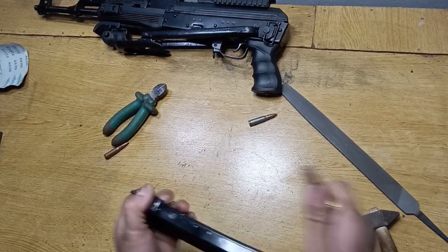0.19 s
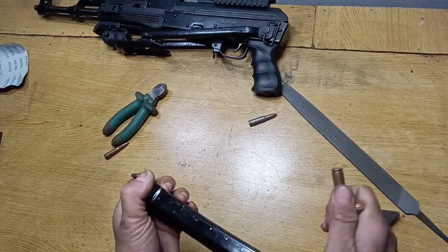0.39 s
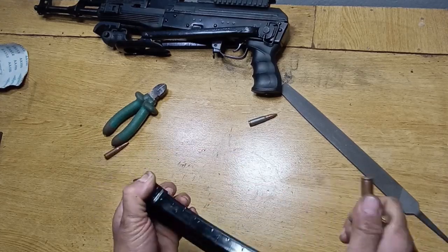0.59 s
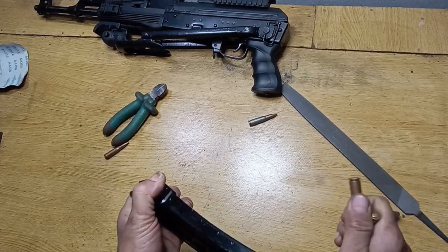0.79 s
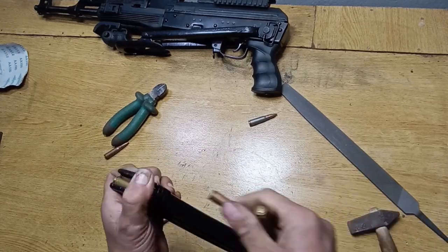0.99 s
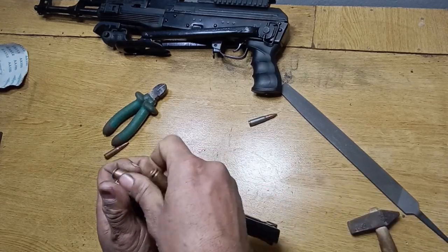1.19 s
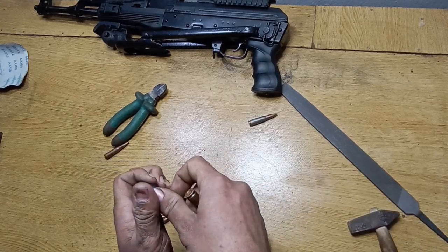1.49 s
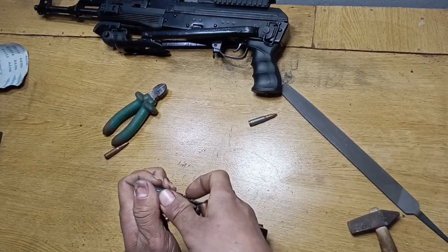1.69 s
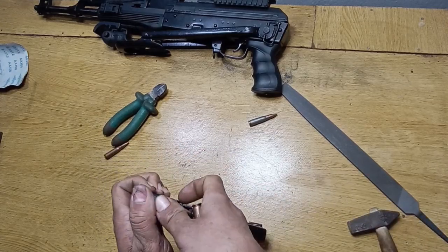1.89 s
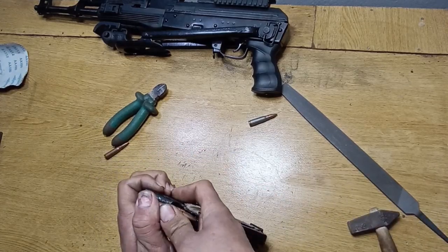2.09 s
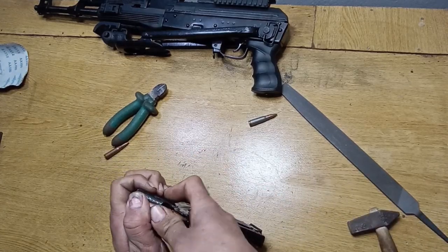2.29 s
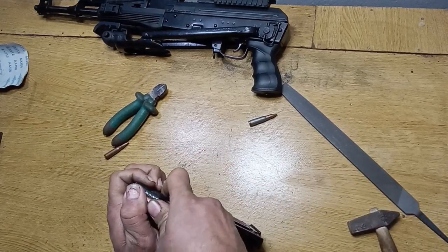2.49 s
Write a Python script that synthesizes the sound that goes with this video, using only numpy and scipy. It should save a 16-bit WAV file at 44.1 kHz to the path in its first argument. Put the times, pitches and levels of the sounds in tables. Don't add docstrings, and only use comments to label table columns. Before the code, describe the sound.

Metal cartridges knock and rattle on a thin steel magazine: a faint bump at the start, bright clacks at 0.25, 0.4 and 0.58 seconds, a softer, roomier one at 0.77. Faint rubbing near 1.0, a sharp tick at 1.25, a wooden bump, scuff and light clack around 1.5. From 2.0 to 2.5, small ticks, low bench thuds and a sliding scrape, then a faint last knock at 2.58. Close, dry small room.

```python
import sys
import numpy as np
from scipy import signal
from scipy.fft import rfft, irfft
from scipy.io import wavfile
from scipy.ndimage import uniform_filter1d, map_coordinates

SR = 44100
rng = np.random.default_rng(int(sys.argv[2]) if len(sys.argv) > 2 else 0)


def gain_from_db(level_db):
    decades = np.asarray(level_db, float) / 20
    return 10 ** decades


def generate_wav(signal):
    frames = np.transpose(np.atleast_2d(signal))
    scaled = np.clip(frames, -1, 1) * 32767
    pcm = np.round(scaled).astype(np.int16)
    wavfile.write(sys.argv[1], SR, pcm)


N = 114660


def at_hz(points, hz):
    points = np.array(points)
    return np.interp(np.log(hz), np.log(points[:, 0]), points[:, 1])


def rms_one(x):
    return x / np.sqrt(np.mean(x ** 2) + 1e-20)


def energy_one(h):
    return h / np.sqrt(np.sum(h ** 2))


def convolve(x, h):
    return signal.fftconvolve(x, h)[:N]


def filtered(x, order, hz, kind):
    return signal.sosfilt(signal.butter(order, hz, kind, fs=SR, output="sos"), x)


def colour(spectrum, rings=()):
    hz = np.arange(4097) * SR / 8192 + 1
    db = at_hz(spectrum, hz)
    for ring_hz, width_hz, boost_db in rings:
        db = db + boost_db / (1 + (2 * (hz - ring_hz) / width_hz) ** 2)
    ceps = irfft(db * np.log(10) / 20)
    ceps[1:4096] *= 2
    ceps[4097:] = 0
    return energy_one(irfft(np.exp(rfft(ceps)))[:4096])


def ring(x, hz, t60):
    r, w = gain_from_db(-60 / (t60 * SR)), 2 * np.pi * hz / SR
    return signal.lfilter([0, np.sin(w)], [1, -2 * r * np.cos(w), r * r], x + 1e-18)


def grains(per_s, spread_db):
    size = gain_from_db(spread_db * np.minimum(rng.exponential(1, N), 4)) * rng.choice([-1, 1], N)
    return rms_one(size * (rng.random(N) < per_s / SR))


# blow_s, peak_db, rattle_lead_in_s, room_db
KNOCK_EVENTS = [
    (0.003, -33, 0.0076, -14),
    (0.247, -20, 0.014, -7.5),
    (0.415, -18, 0.011, -5.5),
    (0.583, -13, 0.0095, -9.5),
    (0.763, -25.5, 0.0061, 0),
    (1.539, -29.5, 0.011, -13),
    (2.579, -33, 0.0047, -9),
]
# pitch_hz, level_db (per Hz)
KNOCK_SPECTRUM = [(50, -41), (140, -10), (660, -22), (900, -9), (4800, -2.5), (7500, -22.5), (10500, -39),
                  (15000, -19.5)]
# pitch_hz, width_hz, boost_db
SHELL_RINGS = [(946, 190, 8.5), (1370, 450, 5), (2424, 590, 8), (3100, 620, 4.5), (4320, 350, 5),
               (5434, 600, 4.5)]


def knocks():
    after_s, after_loss_db = 0.0096, 11.5
    lead_db = 16.5
    scrape_s, scrape_db = 0.02, 22
    t = np.arange(N) / SR
    rattle = grains(13000, 1.2)
    out = np.zeros(N)
    for blow_s, peak_db, lead_s, room_db in KNOCK_EVENTS:
        start_s = blow_s - lead_s
        times_s = [start_s - scrape_s, start_s - 0.001, start_s, blow_s, blow_s + after_s]
        levels_db = [-lead_db - 2 * scrape_db, -lead_db - scrape_db, -lead_db, 0, -after_loss_db]
        shape_db = np.interp(t, times_s, levels_db, -200, -200)
        blow = (np.arange(N) == int(blow_s * SR)) * 1.0
        gripped = [(hz * rng.uniform(0.99, 1.04), width_hz, boost_db + rng.normal(0, 2.5))
                   for hz, width_hz, boost_db in SHELL_RINGS]
        direct = gain_from_db(peak_db - 2 + shape_db) * rattle
        echo = gain_from_db(peak_db + room_db + 27.5) * room(blow)
        out += convolve(direct + echo, colour(KNOCK_SPECTRUM, gripped))
    return out


# start_s, peak_db, pitch_hz
CLACK_EVENTS = [(0.03, -38.5, 1230), (0.113, -51, 1900), (.2385, -22, 1052), (.2410, -19, 2830),
                (.2440, -15, 2240), (.2448, -19.5, 1110), (.2458, -17, 3240), (.2515, -21.5, 4650),
                (.2550, -23, 3560), (.4088, -18, 2090), (.4110, -21.5, 1310), (.4120, -17, 3100),
                (.4128, -12.5, 2330), (.4132, -8.5, 4480), (.4225, -25, 4750), (.4228, -27.5, 2300),
                (.5762, -19, 2600), (.5785, -15.5, 4860), (.5795, -16.5, 3000), (.5797, -28.5, 1180),
                (.5815, -10.5, 4820), (.5822, -19.5, 2520), (.5850, -18, 2780), (.5920, -17, 2300),
                (.5970, -14.5, 4800), (0.7629, -20, 2770), (0.767, -22.5, 4400), (0.771, -15.5, 4470),
                (0.7789, -22, 2400), (0.781, -21.5, 4430), (.797, -19, 4300), (0.816, -23, 3100),
                (.766, -27, 960), (.786, -29, 932), (.802, -37, 966), (1.5355, -22, 3500),
                (1.5375, -16.5, 4810), (1.5395, -25, 2890), (2.5755, -27.5, 2150), (2.5765, -32.5, 2800),
                (2.5760, -33.5, 4500)]


def clacks():
    ring_cycles, edge_cycles = 21, 4
    span = 1500
    t = np.arange(span) / SR
    out = np.zeros(N + span)
    for start_s, peak_db, hz in CLACK_EVENTS:
        shape = gain_from_db(-60 * t * hz / ring_cycles) - gain_from_db(-60 * t * hz / edge_cycles)
        i = int(start_s * SR)
        out[i:i + span] += gain_from_db(peak_db) * shape / shape.max() * np.sin(2 * np.pi * hz * t)
    return out[:N]


# start_s, peak_db, pitch_hz, room_db
TICK_EVENTS = [(0.0305, -32, 3580, -45), (0.1111, -44.5, 3840, -20), (0.1522, -49, 1506, -34),
               (1.0234, -35.5, 2630, -16.5), (1.2496, -12, 5680, -27), (1.3185, -47.5, 2210, -14),
               (1.353, -49.5, 1900, -19), (1.996, -57.5, 3000, -20), (2.011, -54, 1330, -6),
               (2.0115, -57, 3900, -10), (2.138, -51, 2540, -5), (2.171, -52.5, 1460, -10),
               (2.204, -50.5, 5660, -19), (1.727, -51.5, 2760, -16), (1.899, -48.5, 2280, -9),
               (1.9465, -48, 2295, -19), (2.0688, -49, 5000, -11), (2.1058, -38, 3810, -11.5),
               (2.1236, -41, 2210, -20.5), (2.1855, -45.5, 2240, -14), (2.2032, -52, 1660, -19.5),
               (2.537, -47, 2160, -11)]
# pitch_hz, level_db (per Hz)
TICK_SPECTRUM = [(500, -37), (900, -15), (2540, -14), (5400, 9), (7500, -17.5), (10000, -36.5),
                 (14000, -10)]


def ticks():
    spread_s, body_cycles, ring_cycles, ring_db = 0.0054, 10, 15, -5
    crack_per_db, crack_per_octave_db = 2.5, 2.5
    lowest_hz, span = 1060, 2000
    out = np.zeros((2, N + 4000))
    crack = colour(TICK_SPECTRUM)[:400]
    for (start_s, peak_db, hz, room_db), draw in zip(TICK_EVENTS, rng.random((len(TICK_EVENTS), 16))):
        late = draw[:8] ** 2 * (np.arange(8) > 0)
        size = gain_from_db(-12 * late - 6.1 * (late > 0)) * np.sign(draw[8:] - 0.5)
        touch = np.zeros(span)
        np.add.at(touch, (late * spread_s * SR).astype(int), size)
        body_t60 = body_cycles / hz
        body = ring(ring(touch, hz, body_t60), hz * 1.4, body_t60) * hz / 4000
        narrow = gain_from_db(ring_db) * ring(body, hz, ring_cycles / hz) * hz / 9000
        crack_db = crack_per_db * (peak_db + 26) + crack_per_octave_db * np.log2(hz / 4000)
        sound = gain_from_db(crack_db) * np.convolve(touch, crack)[:span] + body + narrow
        sound = filtered(sound, 4, min(lowest_hz, hz / 2), "high")
        i = int(start_s * SR)
        out[:, i:i + span] += gain_from_db(peak_db) * sound / np.max(np.abs(sound)) * [[1], [gain_from_db(room_db + 19)]]
    return out[:, :N]


def rub(strokes, spectrum, rings, per_s=1600, spread_db=0, glide=0):
    glide_period_s, glide_mid_s = 0.66, 2.36
    t = np.arange(N) / SR
    shape = 0
    for start_s, length_s, level_db, attack_s, sag_db in strokes:
        fall_s = 0.0053 + 0.063 * length_s
        rise = np.clip((t - start_s) / attack_s, 0, 1)
        fall = np.clip((start_s + length_s - t) / fall_s, 0, 1)
        shape = shape + gain_from_db(level_db - sag_db * (t - start_s) / length_s) * rise * fall
    if not glide:
        return convolve(shape * grains(per_s, spread_db), colour(spectrum, rings))
    read = np.cumsum(1 + glide * np.sin(2 * np.pi * (t - glide_mid_s) / glide_period_s))
    texture = convolve(grains(per_s, spread_db), colour(spectrum, rings))
    return shape * map_coordinates(texture, [read], mode="wrap")


# start_s, length_s, level_db (rms), attack_s, sag_db
SLIDE_STROKES = [
    (2.229, 0.28, -42.5, 0.036, 22),
]
# pitch_hz, level_db (per Hz)
SLIDE_SPECTRUM = [(500, -10.5), (1200, -24.5), (1550, -3.5), (2750, -3.5), (3700, -5.5), (4200, -16),
                  (5500, -14), (7500, -68.5)]
# pitch_hz, width_hz, boost_db
SLIDE_RESONANCES = [(1700, 240, 8.5), (2150, 240, 10.5), (2793, 310, 13), (3270, 300, -1)]
# start_s, length_s, level_db (rms), attack_s, sag_db
RUB_STROKES = [(.92, 0.22, -51.5, 0.066, 13.5), (1.12, 0.091, -64, 0.011, 6),
               (1.204, 0.077, -43.5, 0.0063, 2.5), (1.405, 0.06, -67.5, 0.0084, 12),
               (1.728, 0.081, -53, 0.00064, 16), (1.9, 0.07, -66.5, .002, 12),
               (2.008, 0.045, -61.5, 0.0056, 13), (2.1, 0.039, -51.5, 0.006, 5),
               (2.174, 0.023, -57, 0.0043, 2), (1.28, 0.078, -61.5, .02, 2), (1.515, 0.027, -54, 0.015, -8),
               (2.315, 0.057, -55.5, 0.011, 3.5), (2.537, 0.017, -66, 0.0027, 8)]
# pitch_hz, level_db (per Hz)
RUB_SPECTRUM = [(600, -39.5), (1000, -20.5), (1440, -10), (2500, -1), (5500, -3.5), (6500, -18.5),
                (9500, -36), (15000, -26)]
# pitch_hz, width_hz, boost_db
RUB_RESONANCES = [(1400, 150, 8), (2050, 150, 8), (2650, 150, 8), (3230, 120, 13), (4450, 160, 12),
                  (5450, 250, 9)]
# start_s, length_s, level_db (rms), attack_s, sag_db
RUSTLE_STROKES = [
    (1.12, 0.054, -63.5, 0.017, 4),
    (1.28, 0.22, -64.5, 0.014, 11),
    (1.405, 0.06, -60.5, 0.0044, 4),
]
# pitch_hz, level_db (per Hz)
RUSTLE_SPECTRUM = [(800, -34), (1200, 9), (1900, 0.5), (3300, -2), (4500, -29)]


def rubs():
    slide = rub(SLIDE_STROKES, SLIDE_SPECTRUM, SLIDE_RESONANCES, glide=0.04)
    short = rub(RUB_STROKES, RUB_SPECTRUM, RUB_RESONANCES, glide=0.04)
    return slide + short + rub(RUSTLE_STROKES, RUSTLE_SPECTRUM, ())


# start_s, length_s, level_db (rms), attack_s, sag_db
DRAG_STROKES = [
    (0, 0.058, -41, 0.0011, 10),
    (1.53, 0.079, -40.5, 0.012, 9),
    (1.69, 0.089, -59, 0.018, 14),
    (2.02, 0.063, -54, 0.011, 6),
    (2.085, 0.2, -42, 0.0093, 8),
    (2.28, 0.21, -58.5, 0.015, 7),
    (2.472, .1, -58, 0.0078, 3),
]
# pitch_hz, level_db (per Hz)
WOOD_SPECTRUM = [(40, -34.5), (100, 4.5), (160, -8), (330, -12.5), (600, -25), (1300, -27.5), (2500, -36),
                 (5000, -97)]
# start_s, length_s, level_db (rms), attack_s, sag_db
SCUFF_STROKES = [
    (1.481, 0.04, -30, 0.0143, 13),
    (1.6, 0.098, -42, 0.019, 16),
]
# pitch_hz, width_hz, boost_db
SCUFF_RESONANCES = [(417, 1000, 8.5), (1820, 270, 1)]


def drags():
    drag = rub(DRAG_STROKES, WOOD_SPECTRUM, [(95, 15, 2), (151.2, 8.7, 15.9), (300, 32, 1.67)],
               per_s=810, spread_db=3.0)
    return drag + rub(SCUFF_STROKES, WOOD_SPECTRUM, SCUFF_RESONANCES, per_s=890, spread_db=-2.5)


# start_s, peak_db, pitch_hz (mode favoured by the spot struck)
BUMP_EVENTS = [(0.001, -36, 111), (0.018, -35, 157), (0.024, -34.5, 330), (0.03, -22, 610),
               (0.237, -31.5, 151), (0.412, -39, 150), (0.579, -31.5, 155), (0.761, -31.5, 148),
               (1.493, -14.5, 335), (1.497, -20, 100), (1.535, -16, 100), (1.577, -37, 200),
               (2.023, -34, 150), (2.068, -33, 146.4), (2.086, -27, 155), (2.109, -22, 155),
               (2.172, -22.5, 151), (2.18, -32.5, 200), (2.201, -23, 135), (2.249, -31.5, 98),
               (2.475, -45.5, 150), (2.498, -54.5, 150), (2.541, -50, 150), (2.582, -20, 100)]
# pitch_hz, level_db, t60_s
BENCH_MODES = [(75.4, -4, 0.086), (99, -6.5, 0.11), (158, -0.5, 0.059), (235, -9, 0.045), (335.2, -3, 0.12),
               (510, -6.5, 0.14), (580, 0.5, .2)]
# start_s, level_db, pitch_hz, t60_s
FREE_BENCH_RING = (.036, -42, 157, .42)


def bumps():
    spot_db_per_octave, bench_db = 9.5, -4.5
    start_s, level_db, hz, t60 = FREE_BENCH_RING
    click = (np.arange(N) == int(start_s * SR)) * 1.0
    out = gain_from_db(level_db) * ring(convolve(click, np.hanning(200) / 100), hz, t60)
    push = np.hanning(int(SR * 0.0035))
    mode_hz = np.array(BENCH_MODES)[:, 0]
    pushes = np.zeros((len(BENCH_MODES), N + 2000))
    uneven_db = rng.normal(0, 1.5, (len(BUMP_EVENTS), len(BENCH_MODES)))
    for (start_s, peak_db, spot_hz), draw_db in zip(BUMP_EVENTS, uneven_db):
        octaves_off = np.abs(np.log2(mode_hz / spot_hz))
        mode_db = peak_db + bench_db + draw_db - spot_db_per_octave * octaves_off
        i = int(start_s * SR)
        pushes[:, i:i + len(push)] += gain_from_db(mode_db)[:, None] * push / push.sum()
    for k, (x, (hz, level_db, t60)) in enumerate(zip(pushes, BENCH_MODES)):
        out = out + (-1) ** k * gain_from_db(level_db) * ring(x[:N], hz, t60)
    return out


# start_s, length_s, pitch_hz, peak_db
HUM_EVENTS = [
    (.155, .04, 1460, -66),
    (.015, .155, 610, -65),
    (1.745, .06, 1380, -64),
    (1.89, .12, 781, -64),
]


def hums():
    t = np.arange(N) / SR
    out = 0
    for start_s, length_s, hz, peak_db in HUM_EVENTS:
        swell = np.sin(np.pi * np.clip((t - start_s) / length_s, 0, 1))
        out = out + gain_from_db(peak_db) * np.sin(2 * np.pi * hz * t) * swell
    return out


# pitch_hz, t60_s
ROOM_DECAY = [(100, 0.24), (700, 0.41), (1840, 0.37), (4850, 0.3), (8000, 0.18), (13000, 0.2)]


def room(x):
    build_s, hold_s, bend_db = 0.0072, 0.033, 303
    t = np.arange(SR // 2) / SR
    edges_hz = 60 * 2 ** np.arange(0, 8.3, 0.5)
    white = rng.standard_normal((2, len(t)))
    tail = 0
    for k, (low, high) in enumerate(zip(edges_hz, edges_hz[1:])):
        band = filtered(white[k % 2], 2, [low, high], "band")
        t60 = at_hz(ROOM_DECAY, np.sqrt(low * high))
        tail = tail + band * gain_from_db(-60 * np.maximum(t - hold_s, 0) / t60)
    tail = tail * (1 - np.exp(-t / build_s)) * gain_from_db(-bend_db * t ** 2)
    return convolve(x, energy_one(tail))


def widen(mid):
    smear = rng.standard_normal(60) * np.exp(-np.arange(60) / 25)
    side = filtered(convolve(mid, energy_one(smear)), 8, 7040, "high")
    return mid + gain_from_db(-11) * side * np.array([[1], [-1]])


def scene():
    knock, (tick, tick_to_room) = knocks(), ticks()
    rubbing = rubs()
    to_room = filtered(tick_to_room, 2, 10000, "low") + gain_from_db(-3.0) * rubbing
    echo = gain_from_db(-9.0) * room(to_room)
    return widen(knock + clacks() + tick + echo + rubbing + drags() + bumps() + hums())


GATE_EDGES = [-60.5, -66.5, -55.5, -66]
GATE_BORDERS = (600, 660, 4900)


def gate(x):
    slope, window_s = 0.96, 0.013
    lows = [signal.sosfiltfilt(signal.butter(3, hz, fs=SR, output="sos"), x) for hz in GATE_BORDERS]
    bands = np.diff([0 * x, *lows, x], axis=0)
    out = 0
    for band, edge_db in zip(bands, GATE_EDGES):
        power = uniform_filter1d(band.mean(0) ** 2, size=int(window_s * SR))
        level_db = 10 * np.log10(np.abs(power) + 1e-14)
        out = out + band * gain_from_db(slope * np.minimum(level_db - edge_db, 0))
    return out


# pitch_hz, level_db (per Hz)
HISS_SPECTRUM = [(30, -20), (100, 0), (330, -3.5), (600, -12), (2500, -12.5), (6000, -19), (10000, -44),
                 (13000, -34)]


def hiss():
    return gain_from_db(-82) * convolve(rng.standard_normal(N), colour(HISS_SPECTRUM))


def band_limit(x):
    return signal.sosfilt(signal.butter(12, 16650, fs=SR, output="sos"), x)


def record(dry):
    x = filtered(np.tanh(dry), 2, 70, "high")
    x = gate(x)
    x = signal.sosfilt(signal.cheby2(10, 30, 16000, fs=SR, output="sos"), x)
    return band_limit(x + hiss())


dry = scene()
out = record(dry)
generate_wav(out)
```